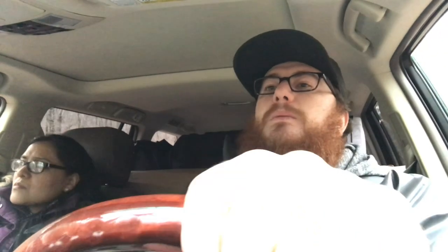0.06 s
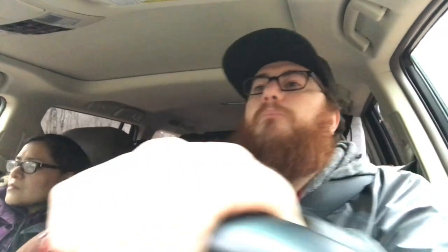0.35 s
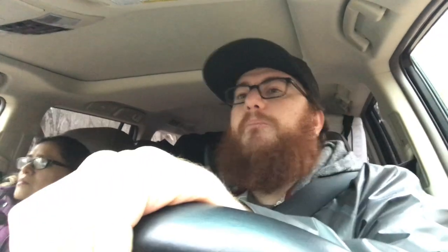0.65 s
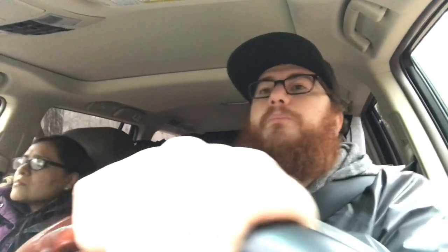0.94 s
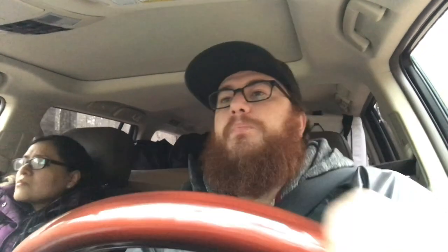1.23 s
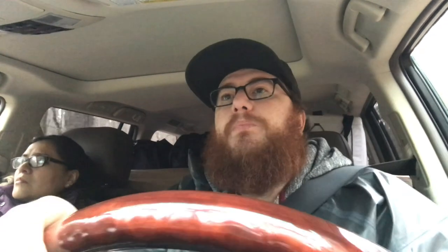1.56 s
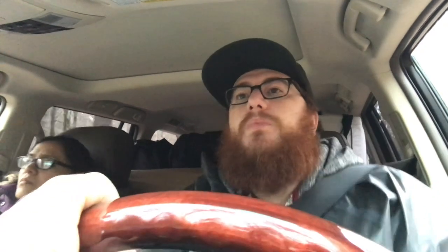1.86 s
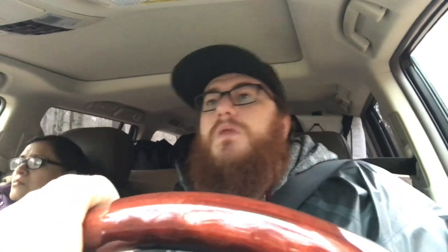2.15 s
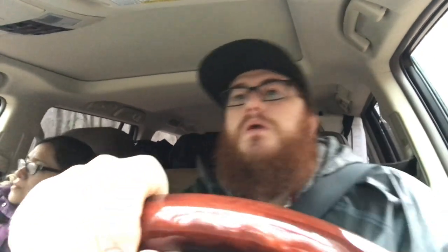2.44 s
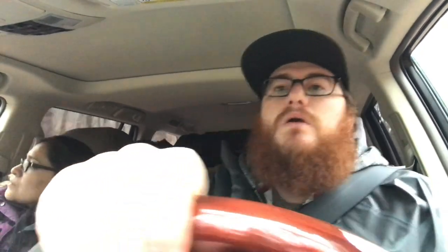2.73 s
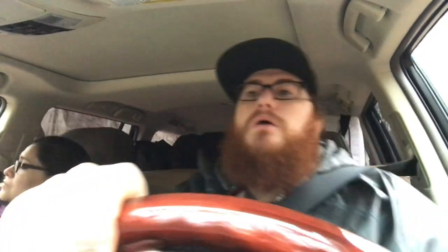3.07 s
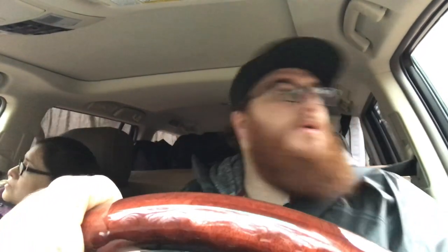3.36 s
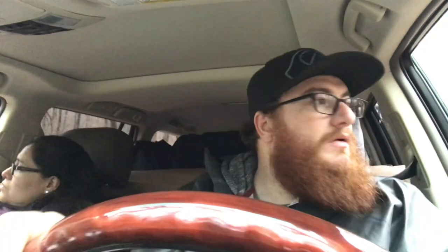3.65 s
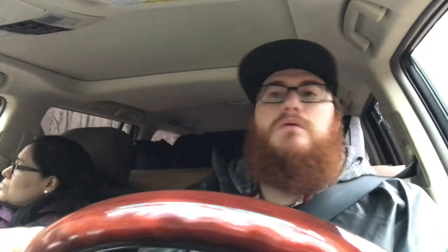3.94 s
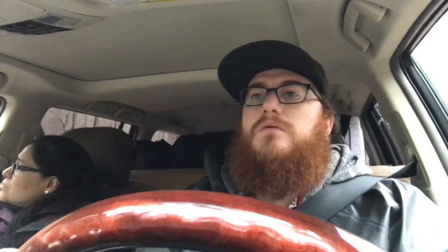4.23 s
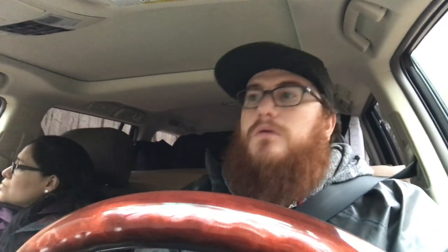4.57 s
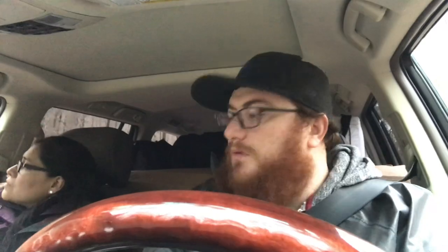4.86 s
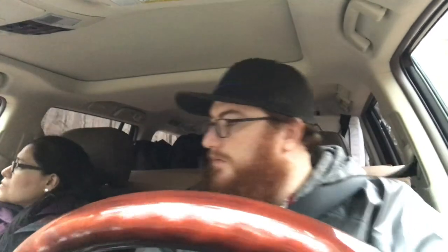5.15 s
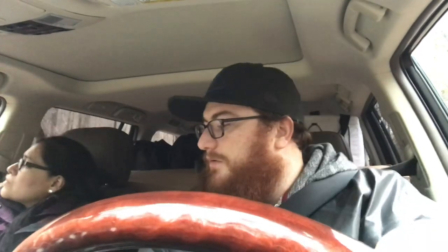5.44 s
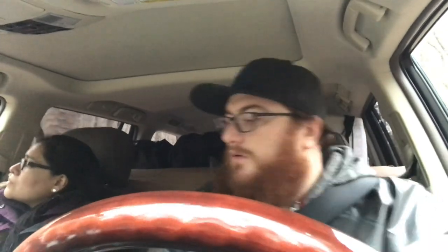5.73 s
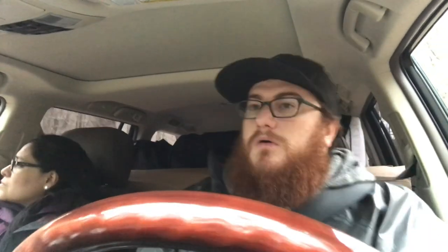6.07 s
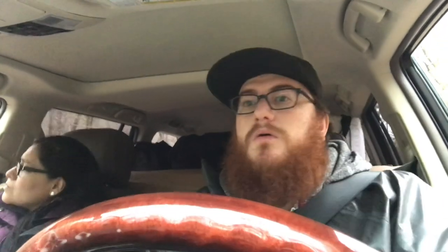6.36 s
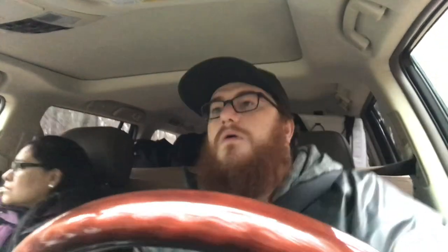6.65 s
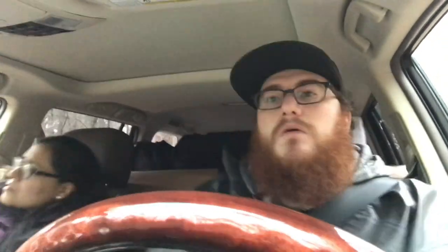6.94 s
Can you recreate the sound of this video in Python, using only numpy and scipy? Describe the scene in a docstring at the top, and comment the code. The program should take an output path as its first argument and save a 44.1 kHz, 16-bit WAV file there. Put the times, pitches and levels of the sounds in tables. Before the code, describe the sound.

Low boom inside a slowly driven car on uneven dirt, with bumps, plastic rattles and jacket rustle, roughest near the end.

```python
"""The low boom of a car's cabin as it rolls slowly over a rough dirt road, from one microphone inside.
The uneven ground shakes the air and the body panels, and bumps thump up through the suspension.
Below the floor the tyres crunch on grit; close by, loose things knock, the trim ticks, and the
driver's nylon rain jacket swishes as he steers and sways. Near the end all drops abruptly to a faint hum."""
import sys
import numpy as np
from scipy import signal
from scipy.fft import rfft, irfft, next_fast_len
from scipy.io import wavfile
from scipy.ndimage import uniform_filter1d, map_coordinates

SR = 44100
rng = np.random.default_rng(int(sys.argv[2]) if len(sys.argv) > 2 else 0)


def wav_record(signal):
    """Record a signal, one row per channel, as 16-bit PCM in the file named by sys.argv[1]."""
    frames = np.transpose(np.atleast_2d(signal))
    bounded = np.clip(frames, -1, 1)
    # unit amplitude maps onto the largest positive 16-bit level
    quanta = np.round(bounded * 32767).astype(np.int16)
    wavfile.write(sys.argv[1], SR, quanta)


N = 317520

# roughness of the road, on a scale where USUAL_ROAD_DB is ordinary ground: time_s, roughness_db
ROAD = [(0.0, -61), (0.62, -59.5), (0.79, -61), (1.04, -61), (1.33, -59), (1.64, -59.5), (2.53, -59.5),
        (3.07, -54.5), (3.21, -57.5), (4.14, -63), (4.7, -64), (5.02, -59.5), (5.64, -60), (5.95, -55),
        (6.32, -56.5), (6.69, -48.5), (6.94, -50.5)]
# patches of gravel under the tyres: middle_s, extra_crunch_db
GRAVEL_PATCHES = [(3.7, 6), (5.1, 5.5)]
# the body heaves through a dip or floats over a crest: middle_s, extra_boom_db
HEAVES = [(.45, 6.5), (1.02, -6), (1.3, 4.5), (2.97, 4.5), (3.28, -4), (4.36, 2.5), (4.54, 5), (4.78, 3),
          (5.02, 3.5), (5.83, 5), (6.57, 4.5), (7.05, 3)]
# suspension bumps: start_s, level_db, pitch_hz
THUMPS = [(0.726, -32.5, 155), (1.241, -36.5, 234), (1.292, -32, 123), (1.335, -32, 119),
          (1.351, -33.5, 272), (1.702, -36, 241), (1.803, -32.5, 154), (2.275, -35.5, 125),
          (2.707, -35, 347), (2.848, -32.5, 240), (2.941, -26, 152), (2.969, -28.5, 130), (3.019, -40, 222),
          (3.762, -38.5, 211), (4.719, -38.5, 237), (4.835, -36.5, 177), (5.372, -38.5, 233),
          (5.794, -30, 163.5), (5.975, -35, 154), (6.279, -34, 289), (6.43, -31, 204), (6.52, -22.5, 145),
          (6.556, -20, 162.4), (6.573, -23.5, 151), (6.63, -32, 370), (6.799, -23, 266),
          (6.811, -29.5, 293), (6.828, -24.5, 177), (6.851, -22, 112), (6.872, -23.5, 126),
          (6.98, -20.5, 153), (7.072, -22, 80)]
# loose things knocking: start_s, level_db, pitch_hz
KNOCKS = [(0.726, -43.5, 593), (1.293, -43, 647), (1.309, -39, 440), (1.611, -48.5, 870), (2.216, -38, 628),
          (2.431, -44.5, 564), (2.708, -41.5, 917), (2.966, -40.5, 940), (2.979, -38, 750),
          (3.153, -34.5, 540), (3.162, -34, 610), (3.602, -46.5, 510), (3.728, -44, 510), (6.171, -35, 590),
          (6.192, -37.5, 610), (6.308, -40, 546), (6.631, -37.5, 574), (6.794, -36, 606), (6.849, -34, 590),
          (6.908, -35, 890), (6.976, -36, 970)]
# trim ticks: start_s, snap_db, panel_relative_db, panel_pitch_hz
TICKS = [(0.271, -57.5, 3, 1200), (0.307, -45, -18, 1730), (0.514, -51.5, 4.5, 1320),
         (0.536, -41.5, -10, 1020), (0.554, -33, -22, 1220), (1.11, -47, -4.5, 1260), (1.29, -39, -6, 1170),
         (1.389, -44, -2.5, 1580), (1.609, -39, -8.5, 1580), (2.129, -54, 6.5, 1670), (2.781, -54, 2, 1270),
         (2.963, -46, -1, 1030), (3.153, -50, 6, 1780), (3.248, -45.5, -4, 1680), (3.354, -46, -7, 1230),
         (3.529, -38.5, -4, 1410), (3.621, -58, 4, 1490), (3.785, -50, -8, 965), (4.002, -50, -6, 1160),
         (4.167, -49.5, -3, 990), (4.291, -65, 8, 1110), (4.421, -60.5, -1, 1750), (4.911, -40.5, -9, 1150),
         (5.143, -43, -14, 1000), (5.263, -36, -11.5, 1300), (5.976, -44, -0.5, 1770),
         (6.239, -43, -11, 1220), (6.355, -53, -6, 1120), (6.372, -48, 2, 1190), (6.755, -52, 11.5, 1170),
         (6.847, -43, -6, 970), (6.875, -48, 3.5, 1230), (6.984, -44.5, 6.5, 1040)]
# small metal clinks: start_s, level_db
CLINKS = [(6.5121, -38.5), (6.57, -38.5)]
# jacket folds flicking over: start_s, level_db
FOLD_FLICKS = [(2.2387, -44), (2.3276, -50), (3.2617, -54), (4.7042, -63), (6.611, -37.5), (6.6514, -50)]
# strokes of the driver's sleeves: start_s, length_s, level_db, sheen_relative_db
SLEEVE_STROKES = [(0.232, 0.37, -52.5, -23), (0.497, 0.51, -62.5, -20), (0.936, 0.49, -52.5, -20),
                  (1.093, 0.55, -52, -5.5), (1.337, 0.23, -48.5, -10), (1.568, 0.54, -52, -11),
                  (1.984, 0.35, -53, -12), (2.305, 0.38, -50.5, -4), (2.38, 0.62, -53, -21),
                  (2.89, 0.16, -47.5, -15), (2.922, 0.43, -51, -9), (3.19, 0.41, -53.5, -4.5),
                  (3.4, 0.48, -59, -7), (3.69, 0.14, -57.5, -13), (3.853, 0.43, -54, -13),
                  (4.384, 0.2, -64.5, -20), (4.662, 0.086, -56.5, -22), (4.764, 0.23, -56.5, -17),
                  (4.97, 0.41, -55.5, -11), (5.454, 0.32, -63, -12), (5.67, 0.41, -53, -11),
                  (6.033, 0.24, -52.5, -12), (6.19, 0.56, -54.5, -20), (6.724, 0.36, -46.5, -9)]
# modes of the plastic trim: pitch_hz, level_db, t60_s
TRIM_MODES = [(2450, 22, 0.0099), (2980, 7, 0.031), (3520, -1.5, 0.012), (4530, -54, 0.012),
              (5730, 18.5, 0.033), (6640, -4, 0.058), (7130, 1.5, 0.011)]
# modes of a hollow knock: pitch_ratio, level_db, t60_s
KNOCK_MODES = [(1, -4, 0.03), (1.55, -18.5, 0.028), (2.9, -15.5, 0.015)]

# each source's spectrum at the microphone: frequency_hz, relative_db
HUM_SPECTRUM = [(25, -10), (70, -3), (135, 3), (190, -6), (260, -15), (600, -16), (950, -29), (3000, -36),
                (9000, -35.5), (15000, -40)]  # the faint closing hum
NYLON_SPECTRUM = [(700, -18), (1300, 6), (2200, 2), (3400, 2), (4200, 2), (4850, -1.5), (5500, 1),
                  (6800, -1), (8100, -7.5), (9600, -7), (10400, -16.5), (11200, -11), (14000, -10),
                  (16000, -15.5)]  # cloth rubbing on cloth
FOLD_SPECTRUM = [(2000, -33), (4000, 0), (6500, 0), (8200, -1), (10500, -5), (15000, -16)]  # a stiff fold flicking
SNAP_SPECTRUM = [(900, -7), (2000, 6), (3000, 11.5), (4600, 8), (5800, -5.5), (7300, 1), (9000, -12),
                 (15000, -16)]  # the crack of a trim tick
TRIM_SPECTRUM = [(500, 8), (900, -6.5), (1200, 4), (1500, -7.5), (1900, 11), (2600, -3), (5000, -50)]  # a plastic panel's clatter
KNOCK_SPECTRUM = [(150, -20), (330, 12), (480, 0), (620, -6), (950, 4), (1300, -11.5), (2200, -13.5),
                  (4500, -14), (9000, -63)]  # loose things' clatter
ROLLING_SPECTRUM = [(250, -5.5), (400, 0.5), (500, 1), (620, 0.5), (780, -3.5), (980, -2.5), (1300, -19.5),
                    (3000, -14), (7000, -46), (15000, -36)]  # tread on dirt
GRIT_SPECTRUM = [(500, -25.5), (850, -8.5), (1100, 11), (1350, 7), (1800, 0.5), (2500, -2.5), (4000, -11),
                 (9000, -45)]  # crunching grit, also the jacket's crinkle
BODY_SPECTRUM = [(70, -36), (110, 3.5), (130, -6), (152, 3.5), (180, -3), (225, -4.5), (280, -4),
                 (340, -10), (420, -18.5), (700, -65.5)]  # shaking body panels
BOOM_SPECTRUM = [(12, -40.5), (24, -10.5), (34, 1.5), (48, 2.5), (62, 3.5), (85, -3), (110, -10),
                 (135, -13.5), (220, -60.5)]  # the cabin air
SHEEN_SPECTRUM = [(3000, -14), (6000, 4), (9000, -1), (10400, -1), (11500, 0), (15000, -21)]
FLOOR_PAN_SPECTRUM = [(90, -9.5), (160, 2.5), (270, 5.5), (420, -11), (560, -21), (1000, -40.5)]

USUAL_ROAD_DB = -60
# each layer's base level on the usual road, and the dB that it gains per dB of roughness
RUSTLE_DB, RUSTLE_GROWTH = -62, 1.16
TYRES_DB, TYRES_GROWTH = -59.5, 1.17
BODY_DB, BODY_GROWTH = -47.5, 0.84
BOOM_DB, BOOM_GROWTH = -41.5, 0.62
STROKE_SKEW, STROKE_POWER = 1.67, 0.77  # an arm starts slowly, stops quickly; loudness follows speed
DRIVE_END_S, TOP_HZ = 7.098, 15720


def amp(db):
    """Decibels to gain."""
    return 10 ** (np.asarray(db) / 20)


def unit(x):
    """x at rms 1."""
    return x / np.sqrt(np.mean(x ** 2) + 1e-20)


def wobble(rate):
    """A smooth random curve, rate knots a second."""
    knots = rng.standard_normal(int(N * rate / SR) + 4)
    return map_coordinates(knots, [np.arange(N) * rate / SR])


def swells(rows, half_width_s):
    """Bell-shaped swells in dB, one for each (middle_s, extra_db) row."""
    t = np.arange(N) / SR
    return sum(db * np.exp(-((t - s) / half_width_s) ** 2) for s, db in rows)


def colour(x, spectrum):
    """x through a causal filter with the given (frequency_hz, relative_db) points."""
    m = 2 * next_fast_len(len(x) // 2 + 4096)
    hz, db = np.transpose(spectrum)
    gain = amp(np.interp(np.log(np.fft.rfftfreq(m, 1 / SR) + 1), np.log(hz), db))
    cepstrum = irfft(np.log(gain))
    cepstrum[1:m // 2] *= 2  # folded for minimum phase
    cepstrum[m // 2 + 1:] = 0
    return irfft(rfft(x, m) * np.exp(rfft(cepstrum)))[:len(x)]


def rush(spectrum):
    """Coloured noise of rms 1."""
    return unit(colour(rng.standard_normal(N), spectrum))


def even(x, span_s):
    """x with its swells slower than span_s levelled out."""
    power = uniform_filter1d(x ** 2, int(span_s * SR))
    return x / np.sqrt(np.abs(power) + 1e-6)


def grains(rate, spread_db):
    """Random tiny impacts, a few much stronger than the rest."""
    sizes = amp(spread_db * np.minimum(rng.exponential(size=N), 4))
    hits = rng.random(N) < rate / SR
    return unit(hits * sizes * rng.choice([-1, 1], N))


def fade(t60, attack):
    """Envelope of a blow: a quick rise and an exponential decay."""
    t = np.arange(SR // 4) / SR
    return amp(-60 * t / t60) * (1 - np.exp(-t / attack))


def peaked(x):
    """x with its strongest 2 ms at rms 1."""
    return x / np.sqrt(uniform_filter1d(x ** 2, SR // 500).max())


def burst(spectrum, t60, attack):
    """Many close, heavily damped modes struck at once."""
    shape = fade(t60, attack)
    return peaked(colour(shape * rng.standard_normal(len(shape)), spectrum))


def ring(hz, t60, attack):
    """One struck mode whose envelope peaks at 1."""
    shape = fade(t60, attack)
    return shape / shape.max() * np.sin(2 * np.pi * hz * np.arange(len(shape)) / SR)


def add(track, s, sound):
    """Mix a sound into the track at s seconds."""
    part = track[max(round(s * SR), 0):][:len(sound)]
    part += sound[:len(part)]


def roughness():
    """How much rougher than usual the road is, in dB, for each sample."""
    times, db = np.transpose(ROAD)
    return np.interp(np.arange(N) / SR, times, db) - USUAL_ROAD_DB


def stone_jolts(rate, db, hz):
    """Small stones jolt the car at random, harder on rough road: start_s, level_db, pitch_hz."""
    draws = rng.random((64, 4))
    road_db = roughness()
    jolts = []
    for chance, when, size, pitch in draws:
        if chance < rate * N / SR / len(draws):
            level_db = db + .5 * road_db[int(when * N)] + 6 * (size - .5)
            jolts.append((when * N / SR, level_db, hz * 2 ** (pitch - .5)))
    return jolts


def faint_hum():
    """A low, steady hum that takes over when the scene changes."""
    fade_in = np.clip((np.arange(N) / SR - DRIVE_END_S) / 0.022, 0, 1)
    return amp(-49.5) * even(rush(HUM_SPECTRUM), span_s=0.11) * fade_in


def cabin_echo(x):
    """The short, dead echo of padded walls close around the microphone."""
    shape = fade(t60=.06, attack=.003)
    tail = shape * rng.standard_normal(len(shape))
    return signal.fftconvolve(x, tail / np.linalg.norm(tail))[:N]


def tyres():
    """Below the floor, a dull rolling noise with grit crunching under the tread."""
    grit = grains(rate=320, spread_db=3) + .5 * rng.standard_normal(N)
    crunch = unit(colour(grit, GRIT_SPECTRUM))
    crunch_db = -7 + swells(GRAVEL_PATCHES, half_width_s=0.044)
    roll_db = TYRES_DB + TYRES_GROWTH * roughness() + .8 * wobble(14)
    return amp(roll_db) * (rush(ROLLING_SPECTRUM) + amp(crunch_db) * crunch)


def fold_flicks():
    """Now and then a stiff fold of the jacket flicks over."""
    track = np.zeros(N)
    for s, db in FOLD_FLICKS:
        add(track, s, amp(db - 7) * burst(FOLD_SPECTRUM, t60=0.053, attack=0.0011))
    return track


def sleeve_gains():
    """Gains of the cloth and of its bright sheen: arm strokes over a rustle that follows the road."""
    t = np.arange(N) / SR
    cloth_power = amp(RUSTLE_DB + RUSTLE_GROWTH * roughness()) ** 2
    sheen_power = cloth_power * amp(-10.5) ** 2
    for start, length, db, sheen_db in SLEEVE_STROKES:
        progress = np.clip((t - start) / length, 0, 1)
        speed = np.abs(np.sin(np.pi * progress ** STROKE_SKEW))
        power = (amp(db) * speed ** STROKE_POWER) ** 2
        cloth_power += power
        sheen_power += power * speed * amp(sheen_db) ** 2
    return np.sqrt(cloth_power), np.sqrt(sheen_power)


def jacket():
    """In the driver's seat nylon slides and crinkles, louder and brighter as the arm speeds up."""
    cloth_gain, sheen_gain = sleeve_gains()
    rubbing = rng.standard_normal(N) + .4 * grains(rate=500, spread_db=4)
    cloth = unit(colour(rubbing, NYLON_SPECTRUM))
    crinkle = unit(colour(grains(rate=220, spread_db=6.5), GRIT_SPECTRUM))
    sheen = rush(SHEEN_SPECTRUM)
    flutter = amp(-0.62 + 0.94 * wobble(35))
    return flutter * (cloth_gain * (cloth + amp(-8.5) * crinkle) + sheen_gain * sheen)


def trim_snap():
    """The trim's modes ring at new strengths and pitches with each tick, under a brief crack."""
    sizes = amp(rng.normal(0, 3, len(TRIM_MODES))) * rng.choice([-1, 1], len(TRIM_MODES))
    modes = sum(size * amp(db) * ring(hz * rng.normal(1, 0.056), t60, attack=0.00062)
                for size, (hz, db, t60) in zip(sizes, TRIM_MODES))
    crack = burst(SNAP_SPECTRUM, t60=0.019, attack=0.00035)
    return peaked(peaked(modes) + 2.1 * crack)


def trim_panel(hz):
    """A struck plastic panel: a dead ring in a clatter of close modes."""
    tone = ring(hz, t60=.018, attack=.0005)
    return peaked(tone + .55 * burst(TRIM_SPECTRUM, t60=.02, attack=.0004))


def knock(hz):
    """A loose thing strikes a panel: hollow and quickly damped."""
    modes = sum(amp(db) * ring(hz * ratio, t60, attack=0.0009) for ratio, db, t60 in KNOCK_MODES)
    return peaked(modes + .33 * burst(KNOCK_SPECTRUM, t60=.035, attack=.001))


def rattles():
    """Close by, loose things knock, plastic trim ticks and a bit of metal clinks."""
    track = np.zeros(N)
    for s, db, hz in KNOCKS:
        add(track, s, amp(db) * knock(hz))
    for s, db, panel_db, hz in TICKS:
        add(track, s, amp(db - 2) * trim_snap())
        add(track, s, amp(db + panel_db + 4.5) * trim_panel(hz))
    for s, db in CLINKS:
        metal = ring(4250, t60=.018, attack=.0015)
        add(track, s, amp(db) * (metal + 0.63 * trim_snap()))
    for s, db, hz in stone_jolts(rate=2.5, db=-51, hz=1250):
        add(track, s, amp(db) * (trim_panel(hz) + 0.8 * trim_snap()))
    return track


def suspension_thumps():
    """The suspension takes each rut or stone with a soft thump that shakes the floor pan underfoot."""
    track = np.zeros(N)
    for s, db, hz in list(THUMPS) + stone_jolts(rate=1.5, db=-39.5, hz=186):
        floor_pan = burst(FLOOR_PAN_SPECTRUM, t60=0.12, attack=0.0041)
        thump = ring(hz, t60=0.091, attack=0.0022)
        add(track, s, amp(db - 1) * (thump + 0.54 * floor_pan))
    return track


def cabin_boom():
    """All around, uneven ground shakes air and body panels in a flutter; the boom swells in each dip."""
    road_db = roughness()
    heave_db = swells(HEAVES, half_width_s=0.07)
    boom_db = BOOM_DB + BOOM_GROWTH * road_db + heave_db + 2 * wobble(18)
    body_db = BODY_DB + BODY_GROWTH * road_db + 0.94 * wobble(16)
    air = amp(boom_db) * even(rush(BOOM_SPECTRUM), span_s=0.0624)
    body = amp(body_db) * even(rush(BODY_SPECTRUM), span_s=.06)
    return air + body


def scene():
    """The drive from inside the cabin, in mono, then the faint hum that follows it."""
    clatter = rattles() + fold_flicks()
    echo = amp(-10) * cabin_echo(clatter)
    drive = cabin_boom() + tyres() + jacket() + suspension_thumps() + clatter + echo
    driving = np.arange(N) / SR < DRIVE_END_S
    return np.where(driving, drive, faint_hum())[None]


def record(dry):
    """The phone's microphone keeps nothing above TOP_HZ."""
    m = next_fast_len(N + SR // 2)
    in_band = np.fft.rfftfreq(m, 1 / SR) < TOP_HZ
    return irfft(rfft(dry, m) * in_band, m)[..., :N]


dry = scene()
out = record(dry)
wav_record(out)
```